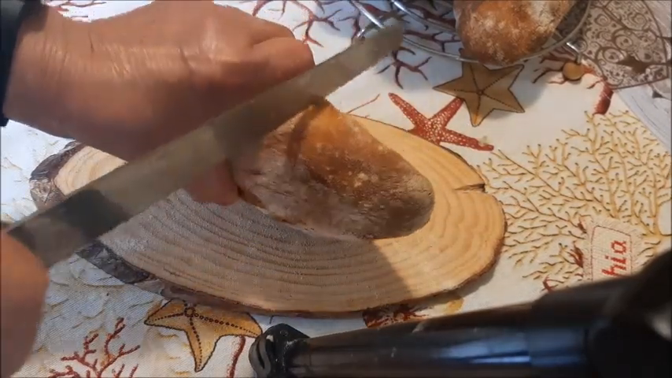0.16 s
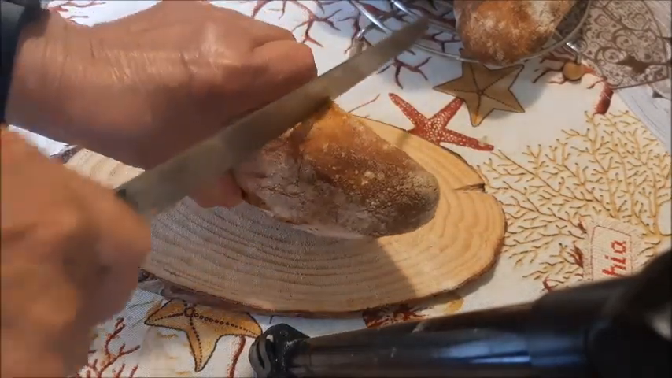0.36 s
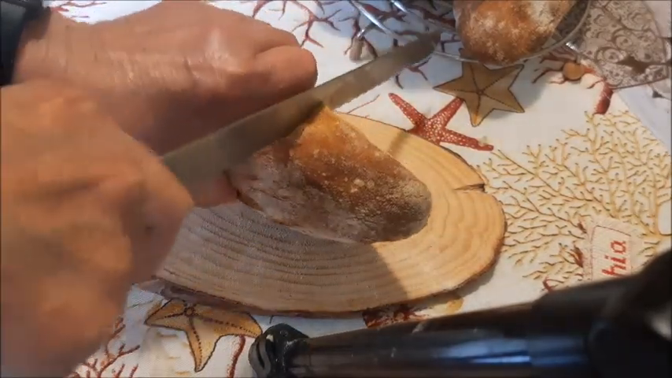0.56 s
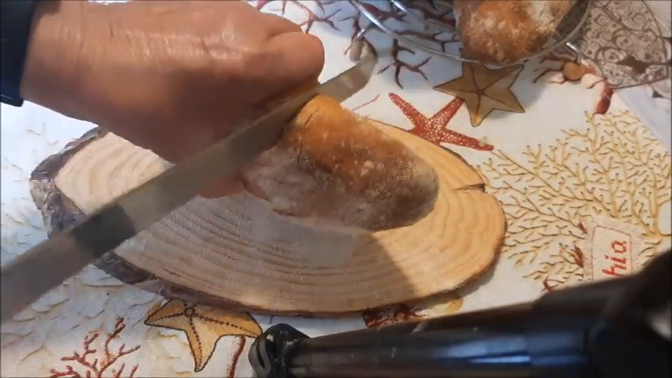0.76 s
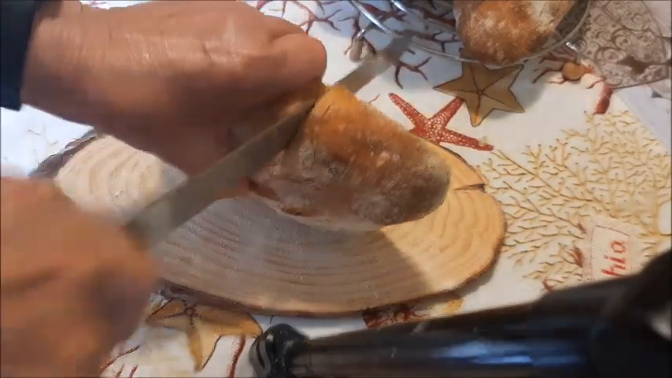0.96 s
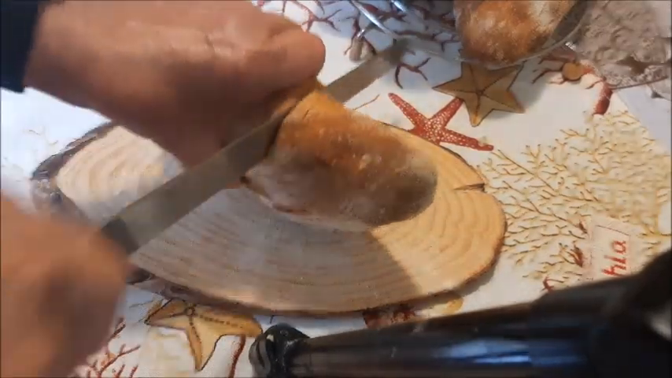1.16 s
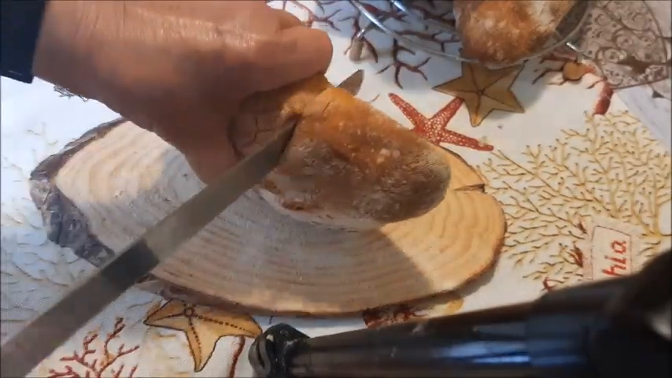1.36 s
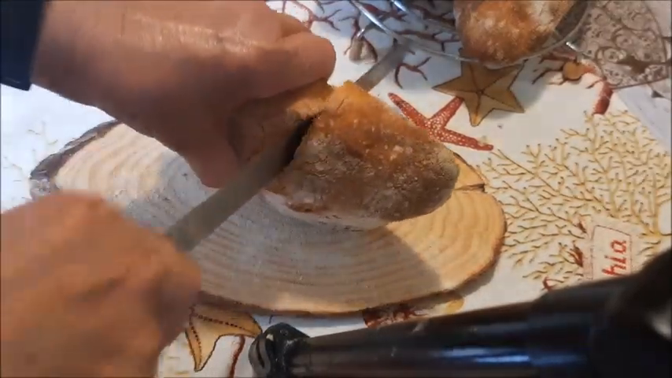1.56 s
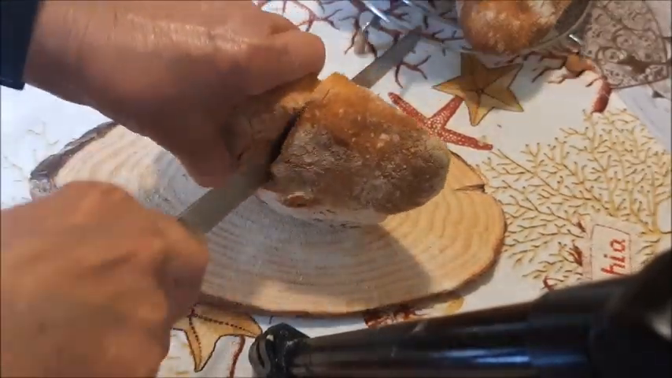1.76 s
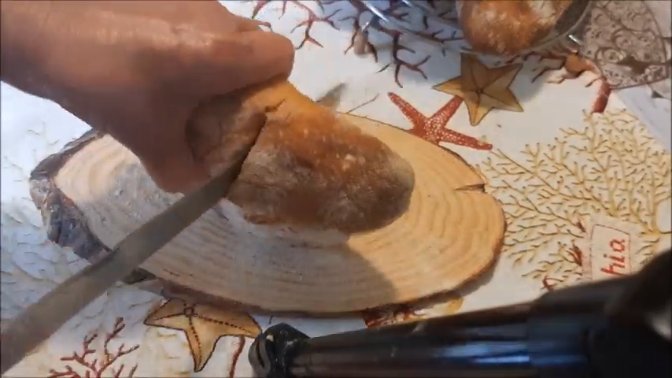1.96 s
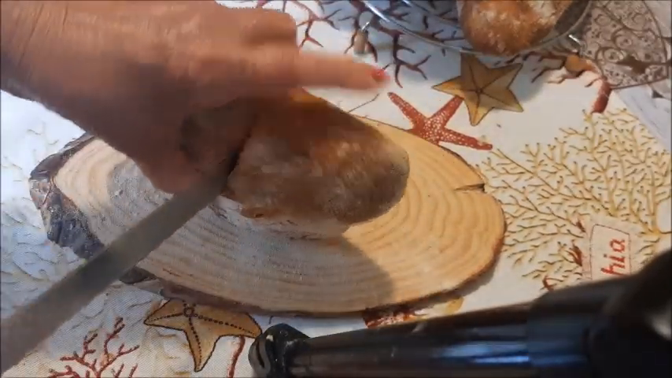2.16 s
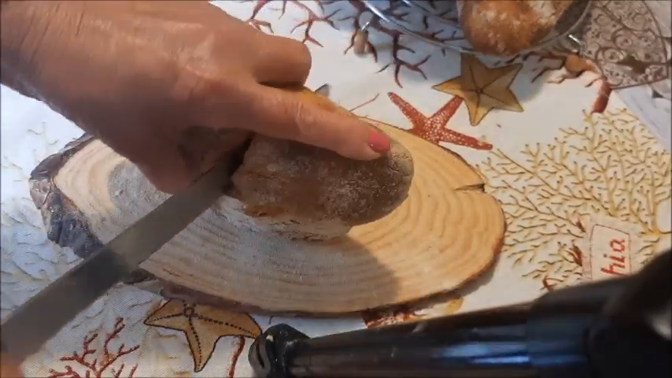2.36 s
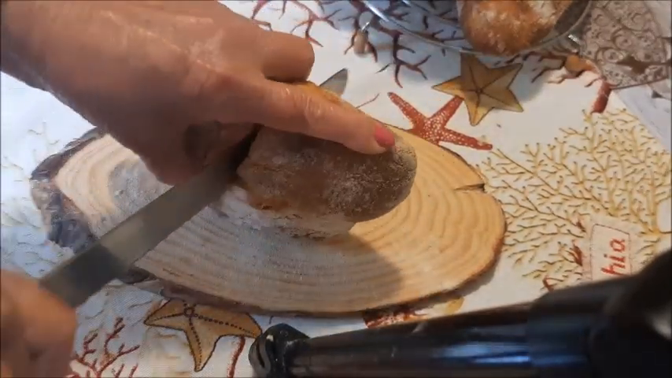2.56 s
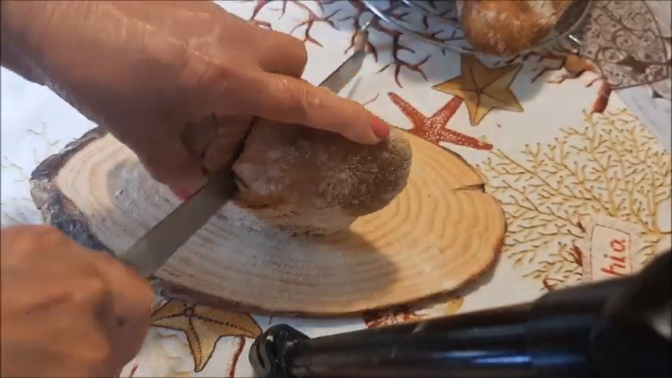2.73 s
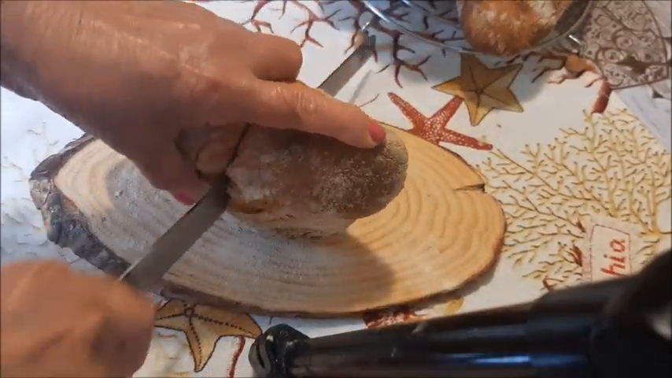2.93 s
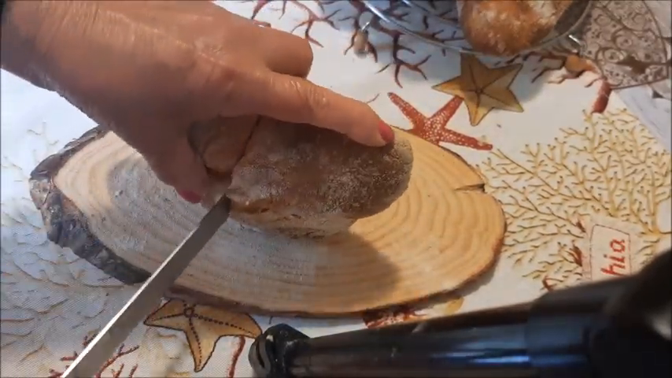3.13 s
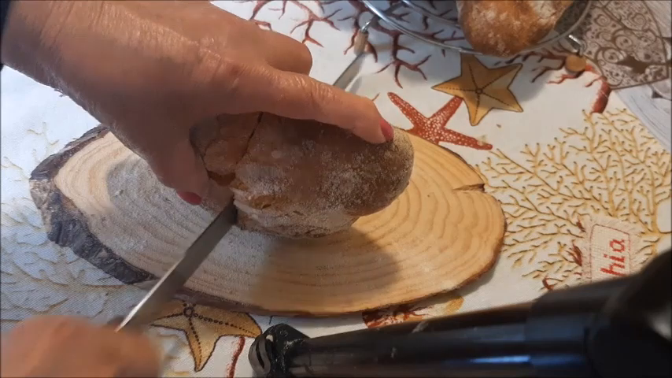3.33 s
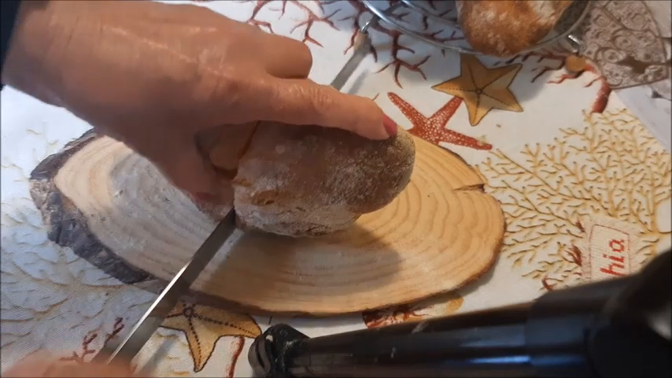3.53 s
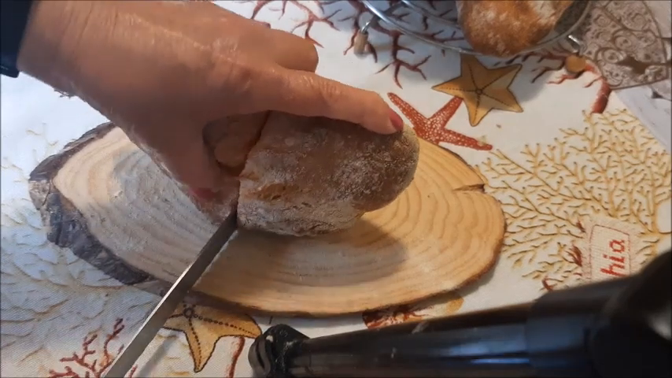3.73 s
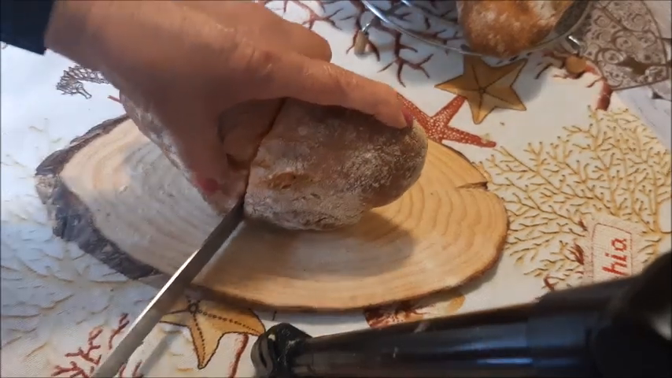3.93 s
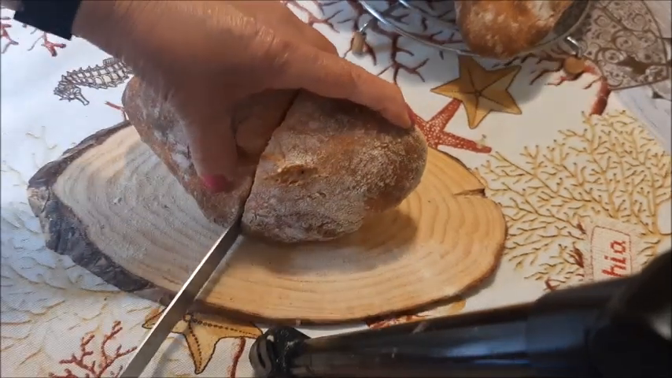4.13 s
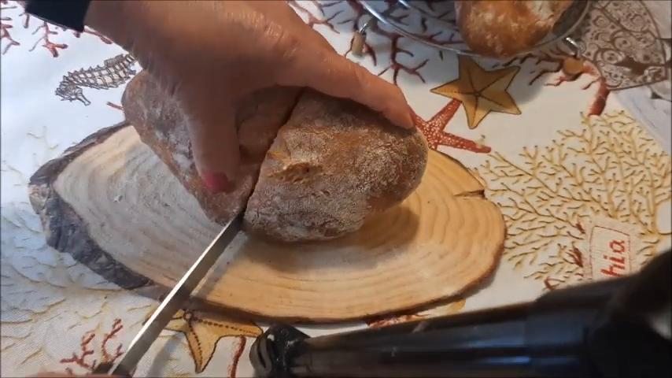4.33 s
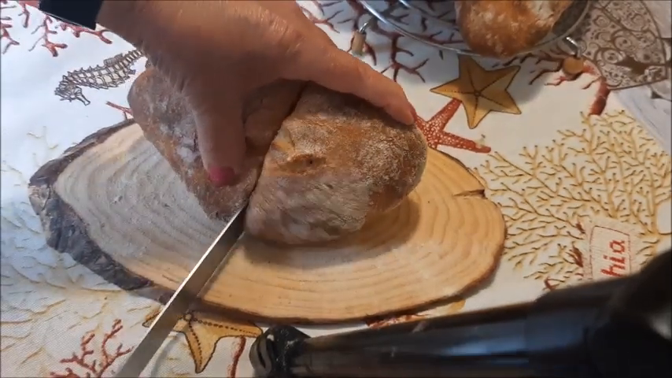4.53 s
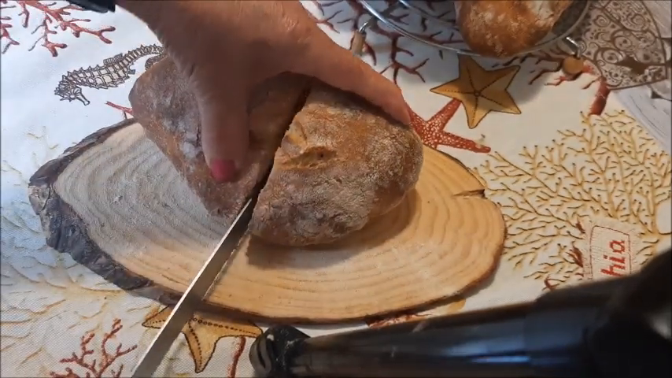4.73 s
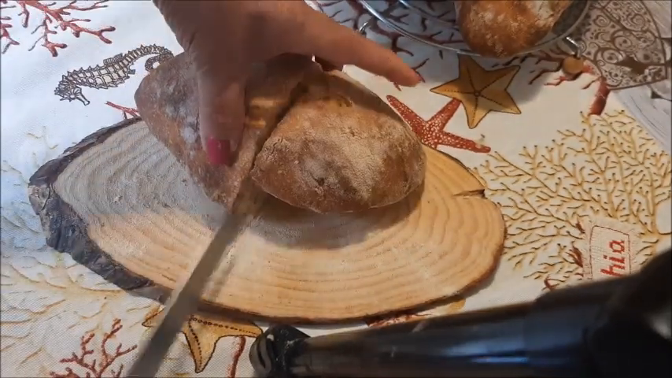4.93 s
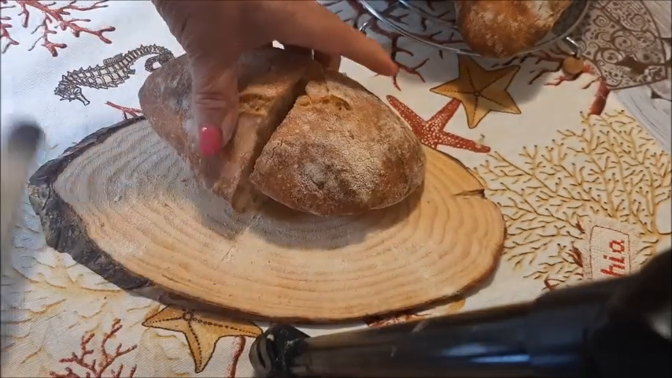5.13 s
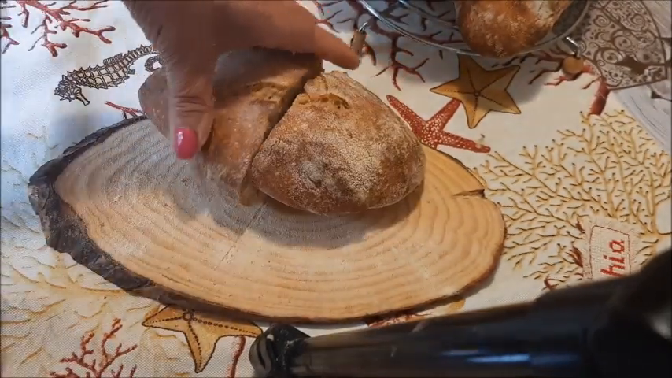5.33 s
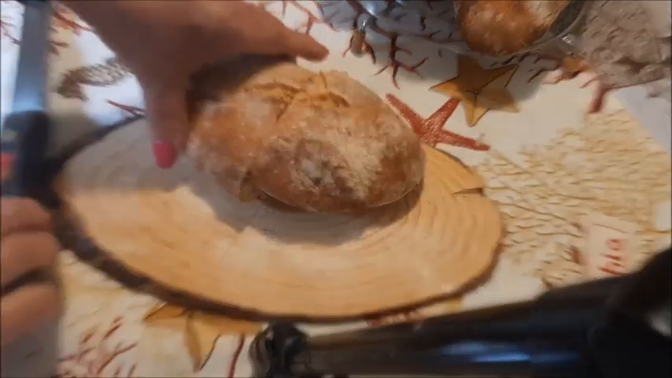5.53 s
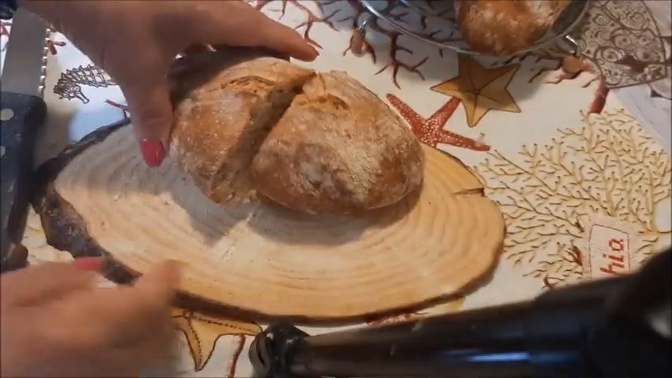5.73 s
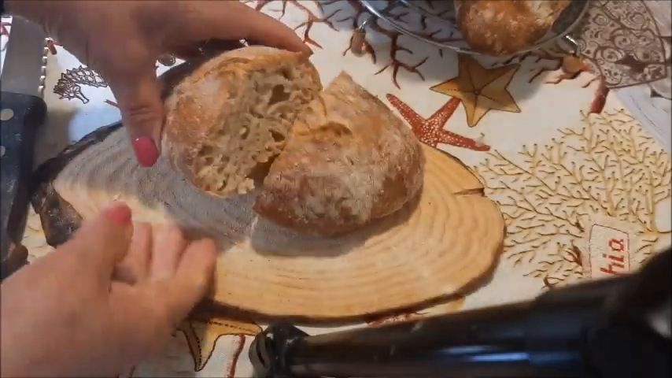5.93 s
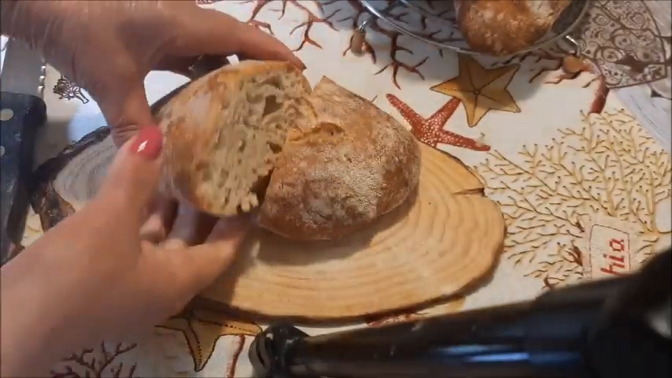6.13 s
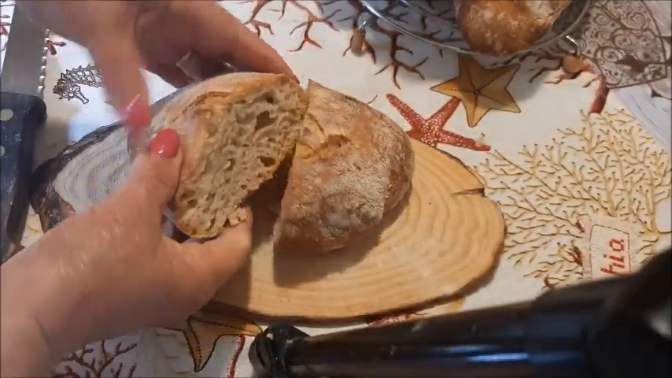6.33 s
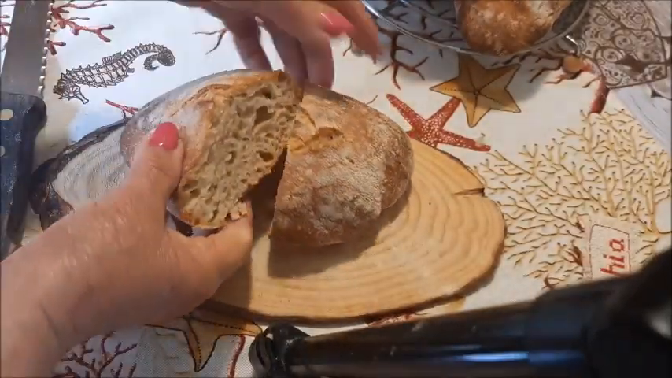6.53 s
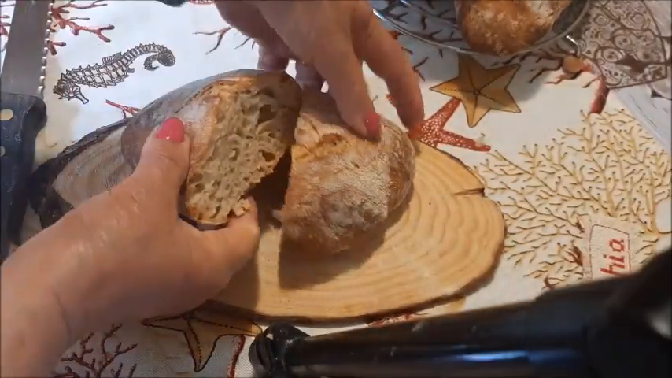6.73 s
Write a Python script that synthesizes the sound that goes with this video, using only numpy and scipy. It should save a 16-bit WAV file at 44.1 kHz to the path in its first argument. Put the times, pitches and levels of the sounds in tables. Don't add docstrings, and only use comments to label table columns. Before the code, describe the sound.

Close stereo pickup in a lively kitchen with faint hiss and low hum. From about 0.2 s a serrated knife saws to and fro through a crusty loaf: grainy rasping strokes, sharp dry snaps and scattered splinters of crust, hollow thuds from the loaf, a thin ringing blade and low shudders of board and table. Cutting is strong and crackly until 1.9 s, lulls briefly around 2.1-2.3 s, then resumes in separate strokes from 2.4 to 3.9 s, gradually duller. Shorter strokes follow at 4.1-4.6 s, the blade landing on the board with low woody thumps near 4.4 and 4.6 s. Tiny ticks and soft rubs occur at 4.9-5.45 s. At 5.52 s the knife drops on the table, a light tip tick and heavy handle knock, with steel rattle and echo. From 6 to 6.7 s fingers softly rub the crust, with a faint squeak, slight nudges and a final tap.

```python
import sys
import numpy as np
from scipy import signal
from scipy.fft import rfft, irfft
from scipy.io import wavfile

SR = 44100
rng = np.random.default_rng(int(sys.argv[2]) if len(sys.argv) > 2 else 0)


def gain_from_db(level_db):
    decades = np.asarray(level_db, float) / 20
    return 10 ** decades


def bounce(signal):
    frames = np.transpose(np.atleast_2d(signal))
    limited = np.clip(frames, -1, 1)
    pcm = np.round(limited * 32767).astype(np.int16)
    wavfile.write(sys.argv[1], SR, pcm)


N = 298998

LEFT_LEAD = 5
KITCHEN_T60_S = 0.64
# full speed at t/s, eases at t/s, blade level/dB, pressure on table/dB, bite into crust/dB
STROKES = [(0.198, 0.191, -44.5, -6, -11.5), (.24, 0.426, -49.5, 2.5, -8), (.45, 0.563, -47, 3.5, -5.5),
           (.65, 0.686, -62.5, 7.5, 4), (0.718, 0.804, -47, 10.5, -6), (0.962, 1.1, -41.5, 3.5, -7.5),
           (1.257, 1.339, -44, 7, -8), (1.509, 1.74, -44, 3.5, -3.5), (1.783, 1.844, -58, 9.5, -4.5),
           (1.89, 1.895, -42, -2.5, -8), (2.017, 2.08, -51, -1.5, -8.5), (2.366, 2.58, -48.5, 1.5, -7),
           (2.635, 2.669, -46.5, 2, -1.5), (2.757, 2.884, -45.5, 7, -3), (3.037, 3.146, -51.5, 2, -6.5),
           (3.305, 3.486, -46, 7, -7.5), (3.604, 3.68, -47, -1, -7.5), (3.701, 3.739, -42.5, 3, -9),
           (3.87, 3.95, -52.5, 2.5, -9.5), (4.11, 4.168, -50.5, -3, -6), (4.318, 4.376, -51.5, -2.5, -12),
           (4.378, 4.397, -47.5, 7.5, -12.5), (4.489, 4.56, -54, 6.5, -8), (4.583, 4.644, -42.5, 0, -8)]
# full speed at t/s, eases at t/s, level/dB, pressure/dB, bite/dB
TOUCHES = [(0.036, 0.052, -52, 0.5, -7.5), (5.8, 5.955, -78.5, -5.5, -1), (4.834, 4.853, -79, 10, -13),
           (4.84, 4.93, -74.5, -2, -3), (4.97, 4.972, -69, 6, -0.5), (5.016, 5.04, -75.5, -6, 1.5),
           (5.342, 5.373, -81, 10, 1), (5.432, 5.467, -67.5, 2, -2), (5.987, 6.06, -68, -15, -6.5),
           (6.139, 6.196, -64, -13, -6.5), (6.25, 6.364, -74, -14.5, 1), (6.45, 6.504, -67, -10.5, -0.5),
           (6.578, 6.641, -72, 10, -0.5), (6.695, 6.696, -67.5, -8, -4)]


def rms_one(x):
    return x / np.sqrt(np.mean(x ** 2) + 1e-20)


def in_time(rows):
    s, *columns = np.transpose(rows)
    return [np.interp(np.arange(N) / SR, s, c) for c in columns]


def colour(x, spectrum, size=4096):
    hz, db = np.transpose(spectrum)
    bins_hz = np.fft.rfftfreq(size, 1 / SR)
    log_gain = np.log(gain_from_db(np.interp(np.log(bins_hz + 1), np.log(hz), db)))
    cepstrum = irfft(log_gain)[:size // 2]
    cepstrum[1:] *= 2
    response = irfft(np.exp(rfft(cepstrum, size)))
    return signal.oaconvolve(x, response[None], axes=1)[:, :x.shape[1]]


def resonate(x, modes, patchy_db=0):
    patches_per_s = 35
    out, size = 0, x.shape[-1]
    for k, (hz, width, db) in enumerate(modes):
        r = np.exp(-np.pi * width / SR)
        gain = gain_from_db(db)
        if patchy_db:
            patches = gain_from_db(patchy_db * rng.standard_normal(400))
            gain = gain * np.interp(np.arange(size) * patches_per_s / SR, np.arange(400), patches)
        ring = signal.lfilter([1 - r, 0, r - 1], [1, -2 * r * np.cos(2 * np.pi * hz / SR), r * r], x)
        out = out + (-1) ** k * gain * ring
    return out


def pair_noise(alike):
    shared, left, right = rng.standard_normal((3, N))
    alike = np.clip(alike, 0, 1)
    common = np.array([shared, np.roll(shared, LEFT_LEAD)])
    return np.sqrt(alike) * common + np.sqrt(1 - alike) * np.array([left, right])


def dying(clicks, t60):
    return signal.lfilter([1], [1, -gain_from_db(-60 / (t60 * SR))], clicks + 1e-9)


def grains(per_s, spread_db, t60, smooth, crisp):
    happens = rng.random(N) < per_s / SR
    sizes = gain_from_db(spread_db * np.minimum(rng.exponential(1, N), 4)) * happens
    envelope = rms_one(rms_one(dying(sizes, t60)) + smooth)
    return 1 + np.clip(crisp, 0, 1) * (envelope - 1)


def struck(times, dbs):
    clicks = np.zeros(N)
    clicks[(np.asarray(times) * SR).astype(int)] = gain_from_db(dbs)
    return clicks


def snap(times, dbs, t60, noise, tail_db=-9, build_s=.001, break_db=14):
    sharp = struck(times + build_s, dbs + break_db) * rng.choice([-1, 1], N)
    shower = gain_from_db(tail_db) * dying(struck(times, dbs), t60) * noise
    return np.array([sharp, np.roll(sharp, LEFT_LEAD)]) + shower


def effort(gain_db, rise_db_per_s, fall_db_per_s):
    start, end, level_db = np.transpose(STROKES + TOUCHES)[:3, :, None]
    t = np.arange(0, N / SR + .002, .002)
    rise_db = rise_db_per_s * np.maximum(start - t, 0)
    fall_db = fall_db_per_s * np.maximum(t - end, 0)
    db = level_db + gain_db[:, None] - rise_db - fall_db
    total_db = 10 * np.log10(np.sum(gain_from_db(2 * db), axis=0) + 1e-12)
    return np.interp(np.arange(N) / SR, t, total_db)


def body(level_db, drive, cracks, alike, shape, **patches):
    noise = pair_noise(alike)
    usual = np.sqrt(np.mean(shape(noise[:1, :2 * SR]) ** 2))
    return shape(gain_from_db(level_db) * drive * noise + cracks, **patches) / usual


def quiet_floor():
    # f/Hz, level per Hz/dB
    floor_spectrum = [(18, -55), (30, -24.5), (98, -2.5), (273, -7), (2480, -20.5), (5900, -7.5),
                      (9460, -16.5), (11400, -16), (16000, -8)]
    return gain_from_db(-74) * rms_one(colour(pair_noise(0.24), floor_spectrum))


def kitchen(x, t60, alike_hz=450):
    t = np.arange(SR) / SR
    echoes = rng.standard_normal((2, SR)) * gain_from_db(-60 * t / t60) * (t > .006)
    low = signal.sosfilt(signal.butter(2, alike_hz, fs=SR, output="sos"), echoes)
    echoes = echoes - low + low[0]
    echoes = echoes / np.sqrt(np.sum(echoes ** 2) / 2)
    return signal.fftconvolve(x, echoes, axes=1)[:, :N]


def knife_drop():
    # t/s, peak level/dB
    drop_knocks = [
        (5.5185, -38),
        (5.5312, -16),
    ]
    # f/Hz, level per Hz/dB
    wood_spectrum = [(29, -42.5), (50, -13.5), (85, 1.5), (163, -2.5), (252, 0.5), (450, -4.5), (650, 2.5),
                     (884, 1), (1300, -7), (1580, -6.5), (2100, -9.5), (2800, -24.5), (7500, -40.5),
                     (16000, -49)]
    # f/Hz, width/Hz, level/dB
    wood_modes = [(87, 9.3, -13), (251.4, 4.9, -7), (610, 40, -2), (1560, 40, 3), (2075, 55, 7)]
    s, peak_db = np.transpose(drop_knocks)
    knock = struck(s, peak_db)[None]
    knock = colour(knock + gain_from_db(4.0) * resonate(knock, wood_modes), wood_spectrum)
    direct = np.vstack([np.roll(knock, 2 * LEFT_LEAD), knock])
    rattle = colour(dying(struck(s, peak_db), 0.052) * pair_noise(0.36), wood_spectrum)
    fading = gain_from_db(-35 * np.maximum(np.arange(N) / SR - s[-1], 0) ** 2)
    echoes = fading * kitchen(knock, KITCHEN_T60_S, alike_hz=750)
    return gain_from_db(17.0) * direct + gain_from_db(11.0) * rattle + gain_from_db(37.5) * echoes


def squeaks():
    squeak_rows = [
        (4.875, 4.93, 1520, -63, 70),
        (5.325, 5.47, 2030, -75, 60),
        (6.27, 6.41, 2870, -73, 14),
        (6.4, 6.52, 2880, -74, 25),
    ]
    out, noise = np.zeros((2, N)), pair_noise(.6)
    for s, end, hz, db, width in squeak_rows:
        at = np.arange(int(s * SR), int(end * SR))
        run_up = SR // 4
        rub = resonate(noise[:, at[0] - run_up:at[-1] + 1], [(hz, width, 0)])[:, run_up:]
        swell = (at / SR - s) * (end - at / SR) * 4 / (end - s) ** 2
        out[:, at] += gain_from_db(db) * swell * rms_one(rub)
    return out


def landings():
    # t/s, f/Hz, level/dB, t60/s
    landing_rows = [
        (4.392, 218, -32, 0.25),
        (4.585, 253, -27, 0.24),
        (4.655, 235, -41, .35),
    ]
    t = np.arange(N) / SR
    out = np.zeros(N)
    for s, hz, db, t60 in landing_rows:
        age = np.clip(t - s, 0, 1)
        soft_start = 1 - np.exp(-age / 0.01)
        out += gain_from_db(db - 60 * age / t60) * soft_start * np.sin(2 * np.pi * hz * age * (1 - 0.3 * age))
    return out


def jolts():
    # t/s, peak level/dB, f/Hz
    jolt_rows = [(0.188, -56, 498), (0.188, -44, 156), (0.237, -42, 234), (0.316, -40, 170),
                 (0.465, -39, 245), (0.523, -34, 94.2), (0.557, -35, 91.5), (0.708, -35, 132),
                 (0.742, -29, 135), (0.796, -28, 148), (0.975, -35, 91.5), (0.976, -30, 188),
                 (1.254, -36, 140), (1.278, -29, 148), (1.469, -43, 277), (1.518, -37, 148),
                 (1.601, -30, 121), (1.666, -35, 116), (1.714, -32, 312), (1.852, -42, 127),
                 (1.883, -41, 310), (1.926, -41, 312), (2.007, -42, 99.6), (2.365, -56, 91.5),
                 (2.366, -42, 328), (2.415, -38, 266), (2.659, -46, 91.5), (2.659, -33, 153),
                 (2.727, -34, 156), (2.78, -28, 194), (2.829, -26, 121), (3.017, -44, 199),
                 (3.294, -34, 320), (3.323, -30, 431), (3.627, -39, 110), (3.696, -33, 240),
                 (3.917, -45, 96.9), (4.113, -50, 498), (4.137, -46, 207), (4.332, -44, 199),
                 (4.372, -36, 369), (4.396, -43, 498), (4.396, -33, 210), (4.578, -31, 248),
                 (4.602, -33, 91.5), (4.602, -27, 231)]
    # t/s, peak level/dB, f/Hz
    nudge_rows = [
        (6.417, -67, 377),
        (6.583, -54, 164),
        (6.599, -53, 334),
        (6.618, -55, 323),
        (6.625, -55, 355),
        (6.644, -60, 180),
    ]
    # t/s, f/Hz, level/dB, t60/s
    steel_ring = (5.5325, 3950, -48, 0.03)
    ring_cycles, jolt_db = 3.0, -4
    out, age = np.zeros(N + SR), np.arange(SR // 8) / SR
    rows = [(s, hz, db + jolt_db, ring_cycles / hz) for s, db, hz in jolt_rows + nudge_rows]
    rows = rows + [steel_ring]
    for (s, hz, db, t60), sign in zip(rows, rng.choice([-1, 1], 99)):
        at = int(s * SR)
        out[at:at + len(age)] += sign * gain_from_db(db - 60 * age / t60) * np.sin(2 * np.pi * hz * age)
    return np.array([out[:N], np.roll(out[:N], LEFT_LEAD)])


def table_and_board(shake, teeth, board_db):
    # f/Hz, width/Hz, level/dB
    table_modes = [(85, 13, 2), (110.2, 9.7, 3), (145.4, 34, -4.5)]
    # f/Hz, width/Hz, level/dB
    board_modes = [(192.2, 17.3, -0.5), (250, 22.2, -2.5), (316, 41, -4.5)]
    pressure_db = np.transpose(STROKES + TOUCHES)[3]
    push_db = effort(pressure_db, 303.5, 200)
    table = body(push_db - 3.0 - board_db / 2, shake, 0, 0.98, lambda v: resonate(v, table_modes))
    both = 0.45 * shake + 0.47 * teeth
    board = body(push_db - 4.5 + board_db / 2, both, 0, 1.0, lambda v: resonate(v, board_modes))
    return table + board


def drummed_loaf(teeth, snags, grip_db, open_db):
    # f/Hz, width/Hz, level/dB
    hollow_modes = [(364, 31, 2), (437, 93, -1), (600.5, 108, -2)]
    # f/Hz, width/Hz, level/dB
    shell_modes = [(695, 42, -2), (788, 97, 0), (937, 276, -1.5), (1157, 190, -3)]
    pressure_db = np.transpose(STROKES + TOUCHES)[3]
    rise, fall = 420, 179.5
    hollow_db = effort(0.54 * pressure_db, rise, fall) + grip_db
    shell_db = effort(0.13 * pressure_db, rise, fall) + grip_db
    s, snag_db, loaf_share_db = snags
    hits = dying(struck(s, snag_db + loaf_share_db - 7.5), 0.07) * pair_noise(0.32)
    hits += struck(s + .001, snag_db + loaf_share_db + 4.5)
    hollow = body(hollow_db + open_db / 2 - 5.8, teeth, hits, 0.8,
                  lambda v, **p: resonate(v, hollow_modes, **p), patchy_db=2.5)
    shell = body(shell_db - open_db / 2 - 7.0, teeth, hits, 0.71,
                 lambda v, **p: resonate(v, shell_modes, **p), patchy_db=2.2)
    return hollow + shell


def ringing_blade(teeth, crumbs, cracks, snags):
    # f/Hz, width/Hz, level/dB
    blade_modes = [(1183, 280, 0.5), (1542, 236, 9), (2034, 128, 9.5), (2272, 91, 5.5), (2465, 240, 5),
                   (2794, 650, 1)]
    blade_db = effort(np.zeros(len(STROKES + TOUCHES)), 448, 201.5)
    crack_s, crack_db = cracks[:2]
    snag_s, snag_db = snags[:2]
    crack_share_db = -24.5
    hits = snap(crack_s, crack_db + crack_share_db + 2.5, 0.05, pair_noise(0.49))
    hits = hits + snap(snag_s, snag_db + 2.5, 0.028, pair_noise(0.13))
    return body(blade_db - 1.5, 0.57 * teeth + 0.5 * crumbs, hits, 0.4,
                lambda v, **p: resonate(v, blade_modes, **p), patchy_db=2.2)


def breaking_crust(teeth, crumbs, sparks, cracks, crisp, sparkle_db):
    # f/Hz, level per Hz/dB
    crust_spectrum = [(1500, -16.5), (2500, -2.5), (3300, -4.5), (3900, -2), (5500, -6), (7500, -7.5),
                      (8000, -14), (8700, -17.5), (10400, -18.5), (11700, -11.5), (14000, -9.5),
                      (16500, -14.5)]
    bite_db = np.transpose(STROKES + TOUCHES)[4]
    crust_db = effort(bite_db, 600, 199)
    s, peak_db, sparkle_share_db, break_db = cracks
    shards_per_s, shard_db, shard_spread_db = 15, -2, 3.0
    at = np.flatnonzero(rng.random(N - SR // 100) < shards_per_s * crisp[SR // 100:] / SR)
    luck = np.minimum(rng.exponential(1, N)[at], 3)
    shards = snap(at / SR, crust_db[at] + shard_db + shard_spread_db * luck, 0.031, pair_noise(0.33))

    def crust_part(kind):
        split = signal.butter(4, 8700, kind, fs=SR, output="sos")
        return lambda v: signal.sosfilt(split, colour(v, crust_spectrum))

    breaks = snap(s, peak_db - 4.5, 0.047, pair_noise(0.1), break_db=break_db) + shards
    crust = body(crust_db - 5.0, 1.7 * crumbs + 0.51 * teeth, breaks, 0.12, crust_part("low"))
    glints = snap(s, peak_db + sparkle_share_db + 11.5, 0.055, pair_noise(0.3), break_db=break_db)
    glints = glints + gain_from_db(sparkle_db + 1.5) * shards
    sparkle = body(crust_db - 4.0 + sparkle_db, 0.63 * crumbs + 0.79 * sparks, glints, 0.13,
                   crust_part("high"))
    return crust + sparkle * gain_from_db(np.array([[-1.5], [1.5]]))


def crust_cracks():
    # t/s, peak level/dB, sparkle share/dB, sharp break over its splinters/dB
    crack_rows = [(0.1786, -30, -13, 12), (0.2348, -24.5, -15, 10), (0.46, -34, -14, 12),
                  (0.5156, -33, -4.5, 9), (0.5288, -20, -38, 12), (0.6487, -29.5, -15.5, 14),
                  (0.7476, -19, -11.5, 13), (0.94, -44, -2.5, 11.5), (1.1343, -23, -8.5, 11),
                  (1.4618, -31, -11.5, 10), (1.484, -21.5, -9.5, 15), (1.57, -26.5, -6, 9.5),
                  (1.703, -36, -21, 10), (1.7155, -15, -10.5, 11), (1.8726, -35.5, -11, 17),
                  (2.369, -29, -22, 19.5), (2.4553, -47, -8, 12), (2.4746, -26, -7, 13),
                  (2.6208, -28, -10, 12), (2.635, -19, -13, 8), (2.6765, -19.5, -18, 10.5),
                  (2.7718, -34, -11, 11), (2.835, -27, -18, 11), (3.016, -31, -13.5, 11),
                  (3.4514, -35.5, -12, 12), (3.5705, -33, -12.5, 11), (3.6194, -29, -26.5, 16),
                  (3.7013, -37, -3, 11), (3.8896, -26, -18, 11), (4.5859, -26.5, -15, 13.5)]
    # t/s, peak level/dB, sparkle share/dB
    tick_rows = [(4.964, -50, -33), (5.0213, -51, -31), (5.369, -47, -40), (5.4176, -39.5, -31),
                 (5.519, -46, -14), (5.5317, -37, -22), (2.102, -42, -15), (.4597, -35, -14),
                 (.7628, -32, -24), (4.3, -42, -24), (1.1095, -37.5, -14), (5.812, -53, -27),
                 (5.8397, -58, -21), (6.1333, -65, -34), (6.6835, -41.5, -34)]
    # t/s, peak level/dB
    splinter_rows = [(0.032, -51), (0.268, -35), (0.4459, -39), (0.6909, -35), (0.7171, -36.5),
                     (0.7322, -36), (0.7971, -29), (0.9523, -39), (1.011, -28.5), (1.059, -25),
                     (1.1073, -34), (1.2194, -35), (1.271, -40), (1.282, -33), (1.593, -29.5),
                     (1.6311, -21.5), (1.8848, -27.5), (2.311, -48.5), (2.3443, -40.5), (2.387, -37),
                     (2.5393, -37), (2.6644, -27), (2.7317, -34.5), (2.861, -43), (2.9193, -35),
                     (3.276, -47), (3.309, -32), (3.4771, -35), (3.6012, -45), (4.092, -40)]
    # t/s, peak level/dB
    chip_rows = [(0.1874, -44), (0.3614, -47), (0.4114, -45), (0.4794, -44), (0.9178, -47), (0.9782, -39),
                 (1.036, -38), (1.0894, -38), (1.2017, -43), (1.2421, -41), (1.3304, -43), (1.3498, -40),
                 (1.509, -39), (1.5304, -40), (1.6084, -34), (1.8502, -40), (1.8914, -42), (2.0078, -49),
                 (2.0314, -46), (2.3321, -44), (2.4089, -46), (2.5124, -44), (2.5314, -40), (2.5651, -46),
                 (2.5985, -40), (2.7531, -37), (2.7854, -35), (2.8064, -39), (2.8988, -38), (3.0364, -49),
                 (3.0525, -42), (3.0674, -41), (3.1088, -41), (3.1258, -44), (3.2924, -38), (3.3584, -43),
                 (3.5104, -46), (3.5284, -46), (3.6744, -42), (3.7314, -40), (3.7614, -44), (3.9294, -52),
                 (4.1014, -47), (4.1654, -48), (4.3264, -52), (4.3734, -47), (4.4464, -55), (4.5421, -44),
                 (4.5614, -38), (6.3274, -67), (6.4577, -59)]
    splinters = splinter_rows + [(s, db + 3) for s, db in chip_rows]
    small = tick_rows + [(s, db, -13) for s, db in splinters]
    rows = crack_rows + [(*row, 14.5) for row in small]
    s, peak_db, sparkle_share_db, break_db = np.transpose(rows)
    return s, peak_db - 1.5, sparkle_share_db, break_db


def tooth_snags():
    # t/s, blade peak level/dB, loaf share/dB
    snag_rows = [(0.235, -35, -15), (0.458, -40, -15), (0.48, -36, -10), (0.514, -37, -10),
                 (0.528, -26.5, -16), (0.648, -48.5, -2), (0.761, -30, -10), (0.995, -32, -6),
                 (1.058, -31.5, -6), (1.09, -29, -12.5), (1.134, -28.5, -30), (1.461, -38, -7),
                 (1.509, -26, -16.5), (1.53, -29, -20), (1.608, -27, -13), (1.713, -32.5, 3),
                 (2.369, -36, -38), (2.407, -36, -4), (2.451, -33, -4.5), (2.474, -30.5, -7),
                 (2.634, -30.5, -4), (2.732, -35.5, -1), (2.785, -30, -8), (2.836, -31, -33),
                 (3.418, -27, -4), (3.477, -34, -8), (3.714, -31, -5), (4.093, -42.5, -4),
                 (4.389, -34.5, -12), (4.579, -28, -12.5)]
    # t/s, blade peak level/dB, loaf share/dB
    tap_rows = [
        (4.966, -57.5, 0.5),
        (5.369, -62, -1),
        (5.417, -56.5, 3),
        (6.684, -59.5, 0.5),
    ]
    # t/s, blade peak level/dB, loaf share/dB
    catch_rows = [(0.1885, -36, -12), (0.2684, -37, -12), (0.3616, -40, -12), (0.4115, -43, -12),
                  (0.7188, -38, -12), (0.7976, -36, -12), (0.9303, -40, -12), (0.9777, -31, -12),
                  (1.0375, -29, -12), (1.1084, -29, -12), (1.2014, -40, -12), (1.2431, -39, -12),
                  (1.284, -33, -12), (1.3304, -35, -12), (1.3503, -34, -12), (1.8502, -44, -12),
                  (1.8891, -36, -12), (2.0108, -43, -12), (2.0314, -42, -12), (2.3306, -47, -12),
                  (2.389, -36, -12), (2.5127, -36, -12), (2.5326, -36, -12), (2.5651, -41, -12),
                  (2.6744, -39, -12), (2.7526, -35, -12), (2.8064, -35, -12), (2.8624, -33, -12),
                  (3.038, -47, -12), (3.053, -44, -12), (3.2939, -42, -12), (3.3588, -39, -12),
                  (3.5294, -43, -12), (3.6017, -38, -12), (3.6744, -37, -12), (3.7319, -31, -12),
                  (3.7614, -33, -12), (3.8906, -41, -12), (3.93, -39, -12), (4.1014, -43, -12),
                  (4.1659, -40, -12), (4.3136, -47, -12), (4.3271, -41, -12), (4.3745, -33, -12),
                  (4.4464, -48, -12), (4.5226, -38, -12), (4.5404, -39, -12), (4.5615, -30, -12),
                  (4.5864, -30, -12), (4.6294, -30, -12), (6.326, -59, -12), (6.4577, -54, -12),
                  (6.5281, -59, -12)]
    catches = [(s, db - 1.5, share) for s, db, share in catch_rows]
    return np.transpose(snag_rows + tap_rows + catches)


def loaf_under_knife():
    # t/s, sparkle/dB, board share/dB, grip of the crumb/dB, openness of the cut/dB
    depth_rows = [(0, 4.5, -2.5, -6, -1.5), (.8, 2.5, 2.5, -1, 2), (1.3, 4.5, 0.5, -1.5, 2.5),
                  (1.75, 7.5, 0, 0, -1), (2.1, 4.5, 1, -5, -2.5), (2.6, 5, 0, -3, 5), (3.1, 2.5, 1.5, 1, 0),
                  (3.45, 2, 0.5, 5, -0.5), (3.9, -2, 7, 1.5, -1), (4.3, -0.5, 1.5, 0.5, -2),
                  (4.65, -2.5, 10, 3.5, -3.5), (5.0, -11, 4, 0.5, 3.5), (5.4, -5.5, 2.5, 2, -0.5),
                  (6.15, -4.5, -7.5, 0, -3.5), (6.35, -2, -4, -7, 0), (6.45, -0.5, 1, 0.5, 4),
                  (6.7, -3, 10, 3, 7)]
    sparkle_db, board_db, grip_db, open_db = in_time(depth_rows)
    knife_out_s = 4.8
    crisp = np.where(np.arange(N) < knife_out_s * SR, 0.7, 0.75)
    shake = grains(97, spread_db=5.0, t60=0.042, smooth=0.95, crisp=crisp)
    teeth = grains(250, spread_db=-2.0, t60=0.032, smooth=0.37, crisp=crisp)
    crumbs = grains(140, spread_db=4.5, t60=0.008, smooth=0.95, crisp=crisp)
    sparks = grains(210, spread_db=8.5, t60=0.013, smooth=0.46, crisp=crisp)
    cracks, snags = crust_cracks(), tooth_snags()
    wood = table_and_board(shake, teeth, board_db)
    bread = drummed_loaf(teeth, snags, grip_db, open_db)
    blade = ringing_blade(teeth, crumbs, cracks, snags)
    crust = breaking_crust(teeth, crumbs, sparks, cracks, crisp, sparkle_db)
    return wood + bread + blade + crust


def scene():
    loaf = loaf_under_knife() + squeaks() + landings() + jolts()
    room = gain_from_db(-11.5) * kitchen(loaf, KITCHEN_T60_S, alike_hz=697)
    balance = gain_from_db(np.array([[1.2], [-1.2]]))
    return (loaf + room + knife_drop() + quiet_floor()) * balance


def top_cut(x):
    return signal.sosfilt(signal.butter(12, 16820, fs=SR, output="sos"), x)


def record(dry):
    limit = .4
    x = limit * np.tanh(dry / limit)
    x = signal.sosfilt(signal.butter(2, 60, "high", fs=SR, output="sos"), x)
    x = x - 0.74 * resonate(x, [(8660, 2300, 0.011)])
    x = signal.sosfilt(signal.ellip(10, 1, 55, 15900, fs=SR, output="sos"), x)
    return top_cut(x)


dry = scene()
out = record(dry)
bounce(out)
```